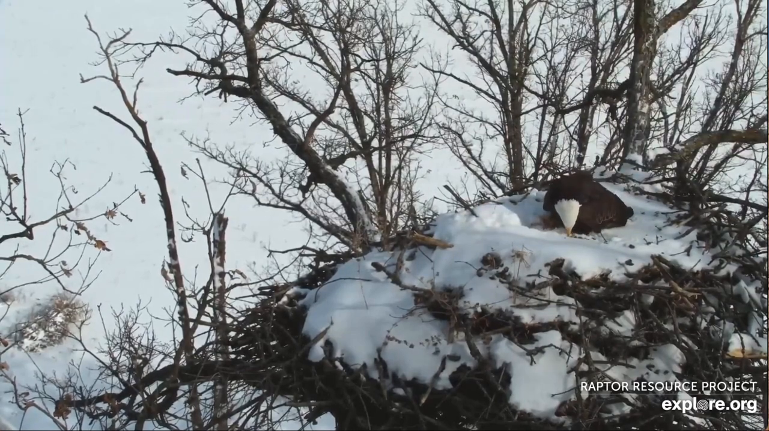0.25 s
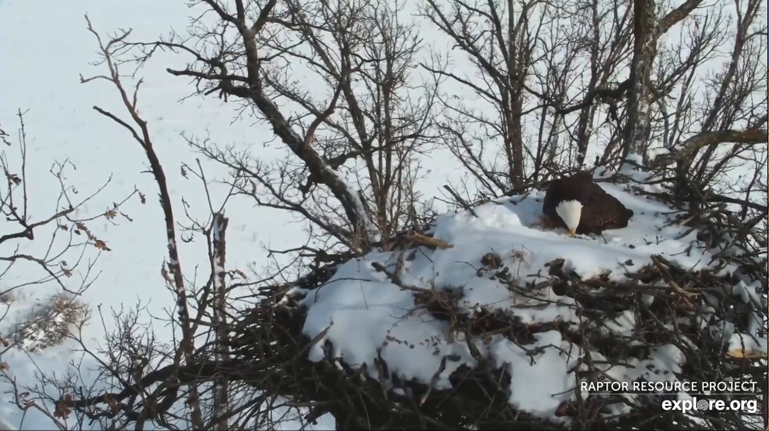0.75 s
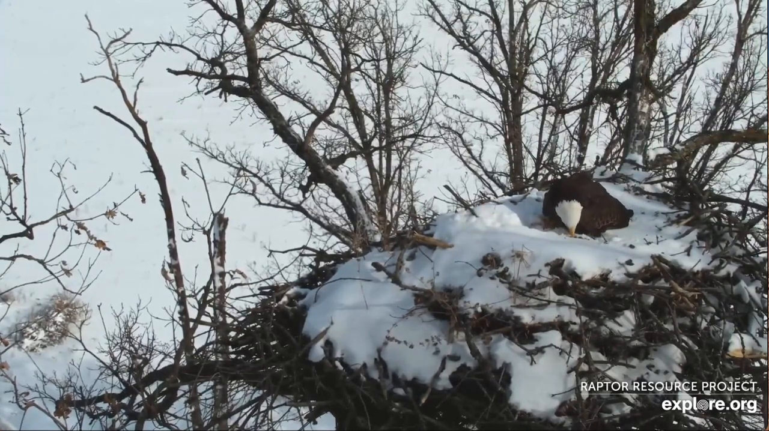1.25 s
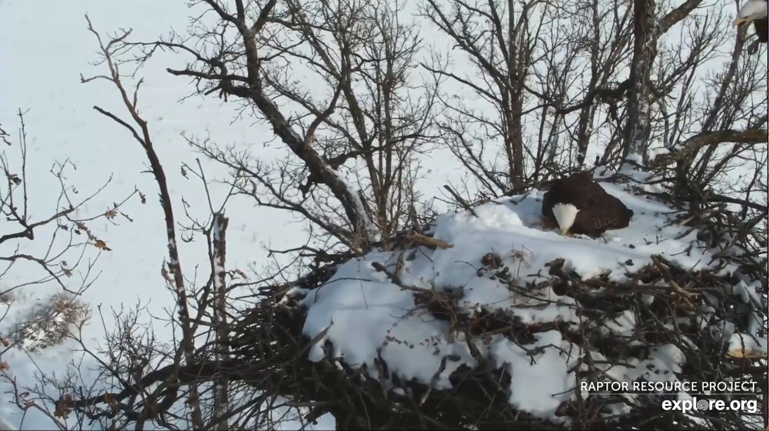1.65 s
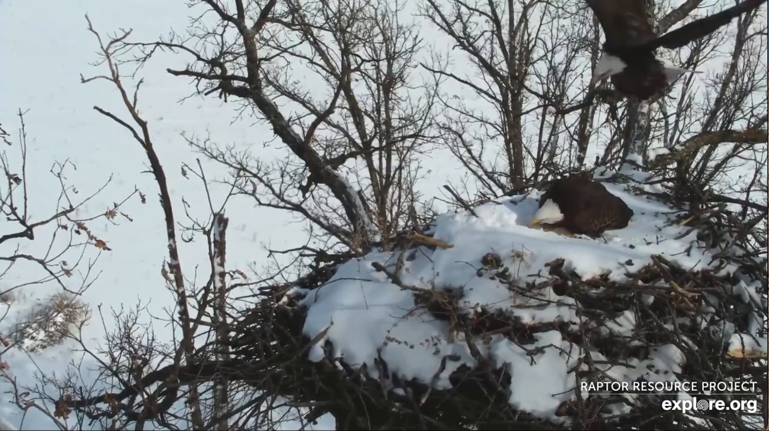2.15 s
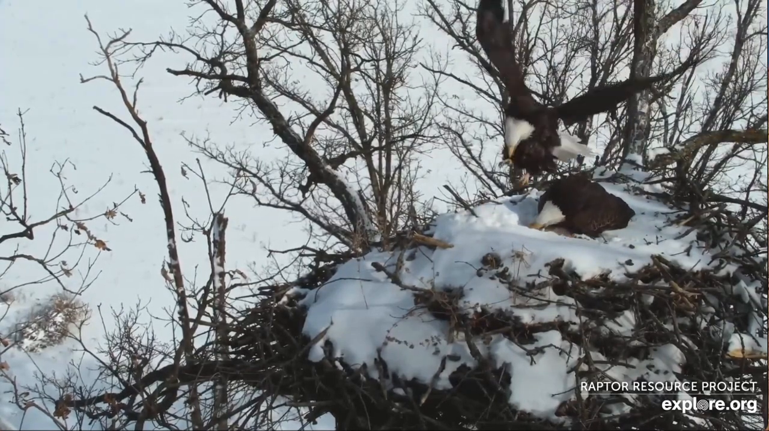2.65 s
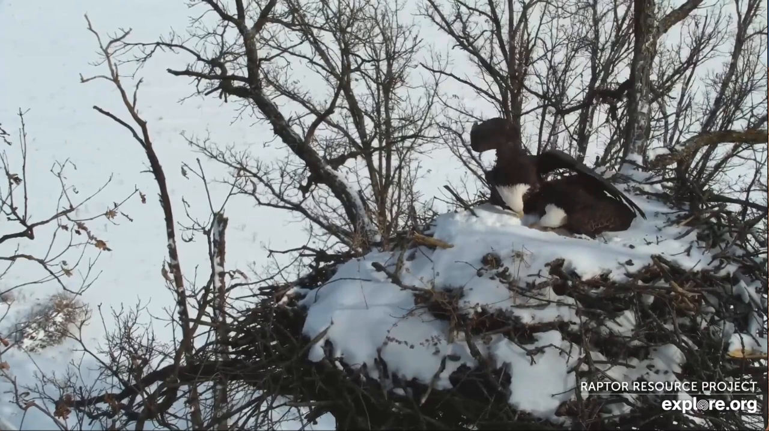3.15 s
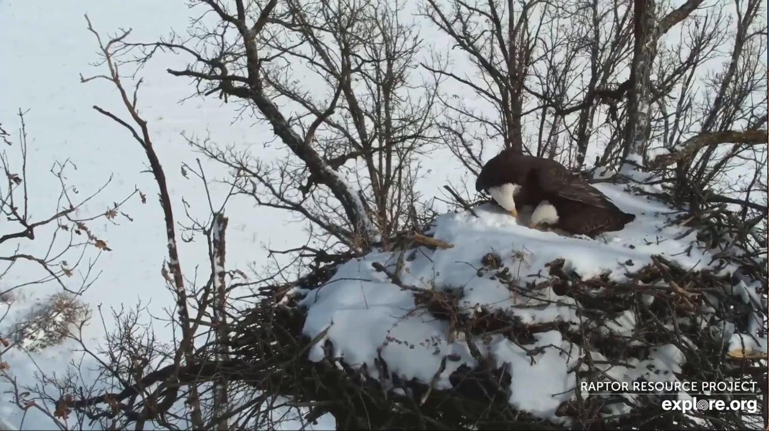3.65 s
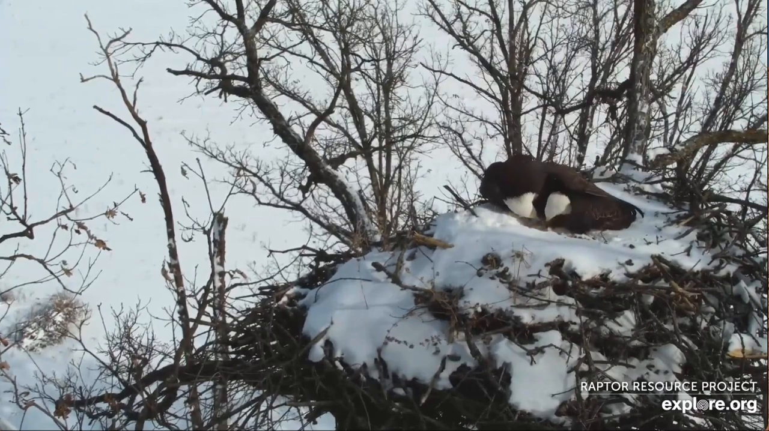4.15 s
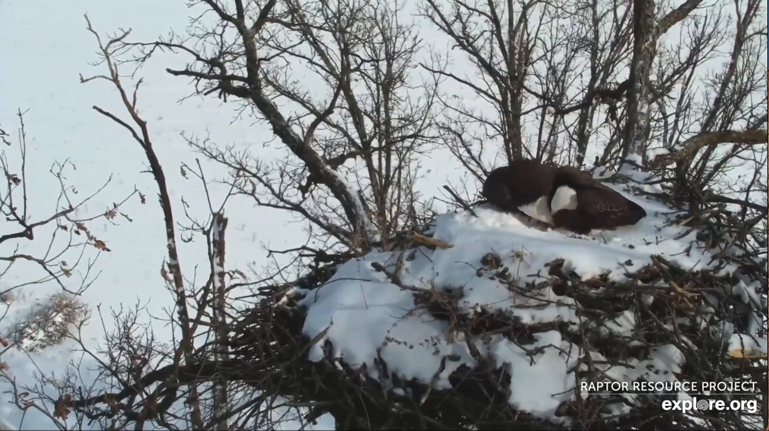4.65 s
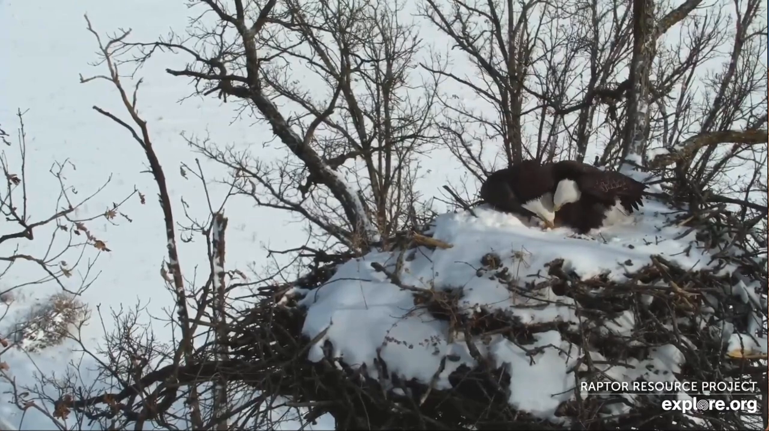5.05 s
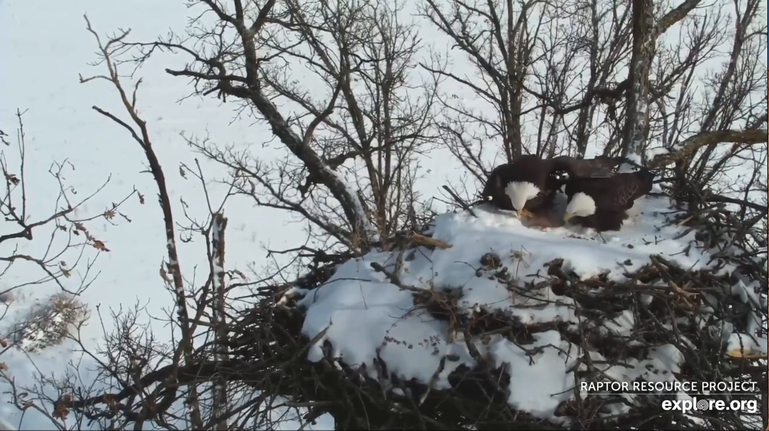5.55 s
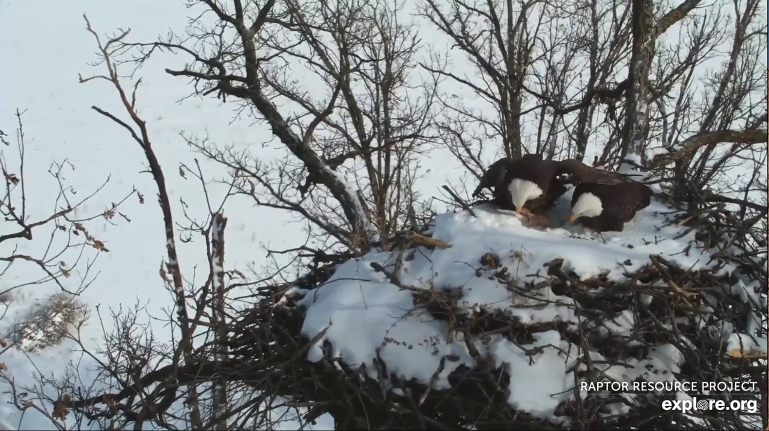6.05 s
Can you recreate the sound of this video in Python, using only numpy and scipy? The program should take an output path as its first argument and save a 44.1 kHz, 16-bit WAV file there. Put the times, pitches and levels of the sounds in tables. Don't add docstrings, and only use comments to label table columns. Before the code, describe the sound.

Outdoors at a treetop nest, wind makes a low, uneven boom on the microphone throughout. From 0 s a near eagle gives a loud, piercing, whistle-like scream while a second, farther bird sounds a fainter, lower rising note. More near screams come at about 0.6-1.1 s and 1.4-1.95 s, stepping abruptly in pitch and ending in hoarse breaks with little air thumps. Soft feather brushes pass near 2.05 s. A very loud yelp at 2.17 s is cut by a tiny dropout; at 2.24 s a rough, wavering scream returns, leaps to a shrill peak around 2.55 s and breaks at 2.75 s. A softer wail, 3.0-4.3 s, jumps to a thin high note; another rises from 4.6 to 5.5 s, with the far bird joining. A low held cry starts at 5.9 s and continues to the end. Sparse twig ticks and short woodland echoes surround the calls.

```python
import sys
import numpy as np
from scipy import signal
from scipy.io import wavfile
from scipy.ndimage import uniform_filter1d, minimum_filter1d

SR = 44100
rng = np.random.default_rng(int(sys.argv[2]) if len(sys.argv) > 2 else 0)


def amplitude_ratio(level_db):
    exponent = np.asarray(level_db, float) / 20
    return 10 ** exponent


def bounce(signal):
    frames = np.transpose(np.atleast_2d(signal))
    limited = np.clip(frames, -1, 1)
    pcm = np.round(limited * 32767).astype(np.int16)
    wavfile.write(sys.argv[1], SR, pcm)


N = 277830


def evened(x):
    return x / np.sqrt(np.mean(x ** 2) + 1e-20)


def read(points, hz):
    f, value = np.transpose(points)
    return np.interp(np.log(hz + 1), np.log(f + 1), value)


def add(mix, s, sound):
    part = mix[round(s * SR):][:len(sound)]
    part += sound[:len(part)]


def spells(rows, gain):
    out = np.zeros(N)
    for start, end, value in rows:
        add(out, start, gain(value) * signal.windows.tukey(round((end - start) * SR), .5))
    return out


def wobble(size):
    return evened(uniform_filter1d(uniform_filter1d(rng.standard_normal(N), size), size))


def noise(points, patchy_db, size=1024, wide=8, long=5):
    frames, hz = 4 * N // size + 5, np.fft.rfftfreq(size, 1 / SR)
    a, b, patches = rng.standard_normal((frames, len(hz), 3)).T
    patches = uniform_filter1d(patches, int(wide), axis=0)
    patches = evened(uniform_filter1d(patches, int(long), axis=1))
    level_db = read(points, hz)[:, None] + patchy_db * np.minimum(patches, 1.4)
    z = (a + 1j * b) * amplitude_ratio(level_db)
    return evened(signal.istft(z, nperseg=size, noverlap=size - size // 4)[1][:N])


# time_s, gust_db
GUSTS = [(0.0, -22.5), (0.17, -30.5), (0.33, -25.5), (0.58, -26), (1.04, -17.5), (1.25, -34.5),
         (1.5, -16.5), (1.93, -21.5), (2.0, -26.5), (2.2, -22.5), (2.69, -20.5), (3.11, -34.5),
         (3.59, -20.5), (4.44, -35), (5.35, -20), (5.74, -30), (6.29, -16.5)]
# frequency_hz, density_db (per Hz)
ROAR_SPECTRUM = [(53, -78), (90, -36), (128, -0.5), (165, -8), (245, -6.5), (798, -26.5), (2300, -50),
                 (15700, -64)]


def wind(near):
    t = np.arange(N) / SR
    boom_db = np.interp(t, *np.transpose(GUSTS))
    roar_db = -21 + 0.11 * (boom_db + 26.5) - 0.56 * t
    near_db = 10 * np.log10(abs(uniform_filter1d(near ** 2, size=3000)) + 1e-9)
    hum_from_s, hum_settles_s = 4.2, .9
    rest_db = -53 - 5.0 * np.clip(t - hum_from_s, 0, 1)
    push_db = np.maximum(-15.5 + 5 * np.minimum(near_db + 9, 0), rest_db)
    push = noise([(1, -22.0), (8, -35), (35, -36.5), (60, -45.5), (200, -104.5)], 2.7, size=8192)
    boom = noise([(38, -72.0), (52, -20.5), (66, -28.5), (73, -18), (80, -27.5), (95, -21.5),
                  (140, -47.5), (400, -114.5)], 3.4, size=8192)
    roar = noise(ROAR_SPECTRUM, 2.2) * amplitude_ratio(1.1 * wobble(size=500))
    settled = np.clip((t - hum_from_s) / hum_settles_s, 0, 1)
    hum_hz = 73 + (2.5 - 1.2 * settled) * wobble(size=6000)
    hum = np.sin(2 * np.pi * np.cumsum(hum_hz) / SR)
    boom = (1 - 0.48 * settled) * boom + (0.51 + .9 * settled) * hum
    hiss = noise([(6000, -48.0), (10000, -8.5), (13500, 0.0), (16000, -4.0)], 2.0)
    limited_push = 0.34 * np.tanh(amplitude_ratio(push_db) * push / 0.34)
    return limited_push + amplitude_ratio(boom_db) * boom + amplitude_ratio(roar_db) * evened(roar) + amplitude_ratio(-58.5) * hiss


# frequency_hz, t60_s
WOODS_DECAY = [(500, 1), (2100, 0.26), (2900, 0.86), (3500, 0.15), (6000, 1), (7500, 0.24), (9000, .6),
               (14000, 0.043)]
# time_s, echo_db
FACING = [
    (0, 1),
    (3, -3),
    (3.9, 1.5),
    (4.5, -11),
    (5.4, 1),
]


def woods(near, far):
    facing_db = np.interp(np.arange(N) / SR, *np.transpose(FACING))
    source = amplitude_ratio(-24.0 + facing_db) * near + amplitude_ratio(-31.5) * far
    taps = np.zeros(SR)
    at = np.arange(900, SR - 20, 20) + rng.integers(0, 20, (SR - 901) // 20)
    taps[at] = rng.choice([-1., 1.], len(at))
    hz, t, z = signal.stft(taps, SR, nperseg=256)
    decay = amplitude_ratio(-60 * t / read(WOODS_DECAY, hz)[:, None])
    tail = signal.istft(z * decay, SR, nperseg=256)[1]
    echo = signal.fftconvolve(source, tail / np.linalg.norm(tail))[:N]
    slap_s, slap_db = 0.016, -18.5
    add(echo, slap_s, amplitude_ratio(slap_db) * near[:N - round(slap_s * SR)])
    return echo


# start_s, peak_db
TWIG_TICKS = [(0.158, -38.5), (0.178, -43.5), (0.194, -39.5), (0.66, -41.5), (0.675, -38), (2.064, -42),
              (2.1651, -27), (2.845, -42), (2.858, -39.5), (5.747, -51), (5.888, -49)]


def ticks():
    out, t = np.zeros(N), np.arange(600) / SR
    for (s, db), grain in zip(TWIG_TICKS, rng.standard_normal((len(TWIG_TICKS), 600))):
        bright = np.diff(grain, n=3, prepend=[0, 0, 0])
        add(out, s, amplitude_ratio(db - 7.5 - 60 * t / 0.016) * bright)
    return out


# start_s, end_s, level_db
WING_BEATS = [
    (2.03, 2.1, -38.5),
    (2.09, 2.17, -44),
    (2.82, 2.89, -48.5),
]


def wings():
    rustle = signal.lfilter([1, -1], [1, -1.7, .72], rng.standard_normal(N))
    return spells(WING_BEATS, amplitude_ratio) * evened(rustle)


# start_s, end_s, start_hz, end_hz, level_db
THIN_TONES = [
    (3.7, 4.27, 2132, 2100, -42),
    (4.23, 4.37, 4200, 4200, -52.5),
    (4.4, 4.338, 1420, 1190, -43.5),
    (5.53, 5.75, 2200, 2200, -54),
    (6.03, 6.299, 870, 900, -36),
    (5.94, 6.04, 1100, 870, -40),
    (5.1, 5.45, 900, 840, -40),
    (2.5, 2.625, 1900, 2010, -27),
    (2.69, 2.79, 2080, 2010, -32),
]


def thin_tones():
    out, waver, swell = np.zeros(N), wobble(size=600), wobble(size=400)
    for start, end, hz0, hz1, db in THIN_TONES:
        at = np.arange(round(start * SR), round(end * SR))
        hz = np.linspace(hz0, hz1, len(at)) * (1 + 0.008 * waver[at])
        tone = np.sin(2 * np.pi * np.cumsum(hz) / SR)
        add(out, start, amplitude_ratio(db + 2.3 * swell[at]) * tone * signal.windows.tukey(len(at), .3))
    return out


# start_s, peak_db, pitch_hz
AIR_PUFFS = [
    (0.422, -33, 246),
    (1.102, -9, 291),
    (1.945, -7.5, 217.2),
    (2.269, -2.5, 395),
    (2.458, -4, 193),
    (2.507, -9.5, 205),
    (2.749, -11.5, 302),
]


def puffs():
    out, t = np.zeros(N), np.arange(900) / SR
    for (s, db, hz), grain in zip(AIR_PUFFS, rng.standard_normal((len(AIR_PUFFS), 900))):
        burst = np.sin(2 * np.pi * hz * t) + 0.47 * evened(uniform_filter1d(grain, size=16))
        add(out, s - .003, amplitude_ratio(db - 3.0) * burst * np.hanning(900))
    return out


def phrase(notes, follows):
    rows = []
    for second_db, upper_db, points in notes:
        s, hz, db = np.transpose(points)
        slack = db - db.max()
        rows += list(np.transpose([s, hz, db, second_db + slack, upper_db + follows * slack]))
    return sorted(rows, key=lambda row: row[0])


# start_s, end_s, shake_db
HOARSE_SPELLS = [(.402, .43, -15), (.85, .892, -24), (1.093, 1.13, -14), (1.362, 1.406, -14),
                 (1.47, 1.5, -18), (1.77, 1.89, -23), (1.938, 1.962, -14), (2.255, 2.29, -13),
                 (2.458, 2.472, -13), (2.5, 2.58, -22), (2.612, 2.637, -15), (2.674, 2.692, -14),
                 (2.74, 2.775, -16), (3.675, 3.70, -16), (3.795, 3.88, -21), (4.2, 4.3, -20),
                 (4.87, 5.06, -19), (5.1, 5.45, -28), (6.06, 6.299, -27), (1.64, 1.78, -22),
                 (1.5, 1.64, -24), (.78, 1.09, -27), (.1, .4, -27), (2.29, 2.45, -25), (1.89, 1.94, -23),
                 (5.49, 5.53, -18)]
# frequency_hz, density_db (per Hz)
BREATH_SPECTRUM = [(300, -6.5), (1500, 3.5), (3000, 1), (4500, -38), (9000, -2.5), (16000, -29.5)]


def voice(calls, order, factor, flat_db, steep, jitter, shimmer_db, breath_db, fuzz_db,
          strain_db, sag_db, gape_db, hollow_db):
    tone, air, huff = np.zeros((3, N))
    pitch = [row[:2] for rows in calls for row in rows]
    hz = np.interp(np.arange(N) / SR, *np.transpose(pitch))
    steady = 1. * (abs(np.gradient(hz)) < 6)
    steady = uniform_filter1d(minimum_filter1d(steady, size=60), size=90)
    hz = hz * (1 + jitter * wobble(size=150))
    churn = wobble(size=12) + 1j * wobble(size=12)
    hoarse = 1 + spells(HOARSE_SPELLS, amplitude_ratio) * (wobble(size=70) * .5 + 1j * wobble(size=70))
    turns, level_drift = np.exp(2j * np.pi * np.cumsum(hz) / SR), wobble(size=300)
    for rows in calls:
        s, *columns = np.transpose(rows)
        at = np.arange(round(s[0] * SR), min(round(s[-1] * SR) + 60, N))
        first_db, second_db, upper_db = (np.interp(at / SR, s, c) for c in columns[-3:])
        upper_db = upper_db + strain_db[at]
        second_db = second_db + sag_db[at] + 2.3 * np.minimum(level_drift[at - 7000], .8)
        turn, beat = turns[at], factor[at]
        shake = beat * (hoarse[at] + amplitude_ratio(fuzz_db) * churn[at])
        fuzz = hoarse[at] + amplitude_ratio(fuzz_db + 0.7 * (first_db + 7.5)) * churn[at]
        slope_db = np.minimum(steep * (upper_db - first_db - flat_db), 0)
        second_churn = 1 + amplitude_ratio(first_db - 26.5) * churn[at - 5000]
        sound = amplitude_ratio(first_db) * turn * shake
        sound = sound + amplitude_ratio(second_db) * (turn * beat * fuzz) ** 2 * second_churn
        for k in range(3, 10):
            octaves = np.log2(k / order) + 6 * np.log2(max(k / 7.5, 1))
            octaves = octaves + 5.5 * np.log2(np.maximum(k * hz[at] / 9800, 1))
            flicker_db = 1.8 * np.log2(k) * np.minimum(level_drift[at - 3000 * k], .6)
            beak_db = (k > order) * gape_db[at] + (k < order) * hollow_db[at]
            partial_db = upper_db + slope_db * octaves + flicker_db + beak_db
            sound += amplitude_ratio(partial_db) * (turn * fuzz) ** k * beat * (k * hz[at] < 16500)
        window = signal.windows.tukey(len(at), min(1, 440 / len(at)))
        edge = amplitude_ratio(shimmer_db * level_drift[at]) * window * (0.23 + .75 * steady[at])
        tone[at] += np.sqrt(2) * sound.imag * edge
        air[at] += amplitude_ratio(upper_db - 6.0 + 0.31 * (first_db + 1)) * edge
        huff[at] += amplitude_ratio(first_db - 20.0) * edge
    hiss = noise(BREATH_SPECTRUM, 6, size=512, wide=4, long=16)
    dull = signal.sosfilt(signal.butter(4, 3800, fs=SR, output="sos"), hiss)
    return tone + amplitude_ratio(breath_db) * (air * hiss + huff * dull)


# [time_s, pitch_hz, effort_db]
FAR_CALLS = [
    (-31.5, -34.5, [(0, 1200, -28.5), (0.15, 1156, -27.5), (0.33, 1183, -32.5), (0.38, 1165, -42.5), (0.42, 1160, -24), (0.5, 1189, -23), (0.72, 1235, -20.5), (0.94, 1278, -25), (0.96, 1326, -67)]),
    (-27, -42.5, [(1.236, 1210, -47), (1.254, 1257, -30.5), (1.256, 1866, -24), (1.31, 1806, -23.5), (1.38, 1859, -26.5), (1.5, 1888, -34), (1.8, 2004, -39.5), (1.93, 1957, -44)]),
    (-27.5, -41, [(1.945, 1920, -31), (1.975, 1924, -19), (2.015, 1796, -34)]),
    (-37.5, -82, [(2.78, 2004, -26), (3.0, 2043, -23.5), (3.07, 2173, -27.5), (3.115, 2164, -25), (3.135, 2147, -48)]),
    (-26, -52.5, [(3.348, 1927, -21), (3.358, 1880, -24), (3.372, 1565, -26)]),
    (-36, -46, [(3.64, 1305, -35.5), (3.72, 1417, -30), (3.8, 1442, -31.5), (4.11, 1554, -24.5), (4.14, 1570, -49)]),
    (-28, -33.5, [(4.78, 1254, -28.5), (4.83, 1275, -26), (4.95, 1313, -27.5), (5.05, 1321, -22), (5.2, 1370, -20), (5.43, 1420, -21), (5.448, 1358, -22.5), (5.462, 1163, -26)]),
]
# start_s, end_s, overtones_db
FAR_SLACK_SPELLS = [
    (4.77, 5.0, -9.5),
]
# start_s, end_s, level_db
FAR_SECOND_SAGS = [
    (2.97, 3.15, -15),
]


def far_bird():
    calls = [phrase([call], follows=1) for call in FAR_CALLS]
    return voice(calls, order=3, factor=np.ones(N), flat_db=17.0, steep=0.94, jitter=0.00354,
                 shimmer_db=1.5, breath_db=0.0, fuzz_db=-28.5,
                 strain_db=spells(FAR_SLACK_SPELLS, float), sag_db=spells(FAR_SECOND_SAGS, float),
                 gape_db=np.zeros(N), hollow_db=np.zeros(N))


# start_s, end_s,
# start_beat_hz, end_beat_hz, lower_sideband_db
SIDEBAND_BEATS = [(0.656, 0.708, 847, 729.5, -14.5), (1.362, 1.417, 1883, 1955, -4),
                  (1.466, 1.494, 2098, 1985.5, -5.5), (1.497, 1.57, 1879, 1761, -20.5),
                  (2.254, 2.271, 1012, 1106, -5.5), (3.009, 3.027, 673, 735.5, -10.5),
                  (2.504, 2.554, 2717.5, 2303, -21.5), (2.606, 2.651, 2050.5, 1963.5, -13),
                  (2.555, 2.59, 2090.5, 2079.5, -22), (1.545, 1.64, 1521, 1258, -28),
                  (1.79, 1.925, 1428.5, 1058, -33), (1.366, 1.404, 470.5, 482.5, -11),
                  (2.256, 2.276, -960, -820, -7), (2.268, 2.286, -420, -350, -14),
                  (2.762, 2.778, 598, 563, -8), (5.46, 5.505, -1060, -1000, -26),
                  (5.245, 5.275, -1380, -1380, -24), (2.272, 2.286, 399.5, 429.5, -15),
                  (2.16, 2.176, 600.5, 602.5, -16.5), (2.626, 2.642, -480, -380, -10),
                  (2.3, 2.36, 330, 300, -26.5), (2.612, 2.632, -620, -420, -20),
                  (4.275, 4.29, -850, -950, -17), (2.29, 2.32, 957.5, 938.5, -29),
                  (5.935, 5.99, -700, -690, -38), (2.622, 2.635, 1545, 1569, 0),
                  (2.623, 2.634, -530, -480, -8.5), (2.602, 2.624, 559.5, 539.5, -11.5),
                  (2.678, 2.69, 2133.5, 2202, 0), (3.325, 3.701, 1018, 1101.5, -32.5),
                  (5.912, 5.929, 670, 744.5, -17.5), (4.605, 4.632, 586, 769, -15),
                  (4.939, 4.987, 620.5, 638.5, -8.5), (4.992, 5.05, 639.5, 646, -4.5),
                  (5.05, 5.074, 621, 620, -9.5)]
# start_s, end_s, start_beat_hz, end_beat_hz, level_db
MEMBRANE_DUETS = [
    (3.796, 3.872, 560, 480, -13.5),
    (3.885, 4.001, 540, 430, -7),
    (4.107, 4.255, 505, 420, -5),
    (5.94, 5.99, 720, 700, -30),
]


def beating():
    out, rasp = np.ones(N, complex), wobble(size=40)
    flutter = amplitude_ratio(3.8 * wobble(size=120))
    for table, upper_db in [(SIDEBAND_BEATS, -10.5), (MEMBRANE_DUETS, -24)]:
        for start, end, hz0, hz1, low_db in table:
            n = round((end - start) * SR)
            beat_hz = np.linspace(hz0, hz1, n) + 28 * rasp[:n]
            turn = np.exp(2j * np.pi * np.cumsum(beat_hz) / SR)
            sidebands = amplitude_ratio(low_db) / turn + amplitude_ratio(low_db + upper_db) * turn
            window = signal.windows.tukey(n, min(1, 260 / n))
            add(out, start, sidebands * flutter[round(start * SR):][:n] * window)
    return out


# [time_after_break_s, pitch_hz, effort_db]
CLOSING_STEPS = [
    (-21, -28.5, [(-.013, 2360, -7.5), (0.0, 2230, -14.5)]),
    (-31.5, -64.5, [(.002, 1750, -25), (.015, 1587, -25)]),
]


def closing(s, last_db):
    return [(second_db + db, fourth_db + db, np.array(points) + [s, 0, db])
            for (second_db, fourth_db, points), db in zip(CLOSING_STEPS, [0, last_db])]


# [time_s, pitch_hz, effort_db]
SCREAM_1 = [
    (-23.5, -42, [(0.0, 2740, -9.5), (0.03, 2570, -27)]),
    (-22, -38.5, [(0.039, 2324, -13.5), (0.081, 2430, -8), (0.092, 2457, -14.5)]),
    (-21.5, -35.5, [(0.096, 2738, -14), (0.192, 2815, -10), (0.215, 2830, -15), (0.224, 2764, -18.5)]),
    (-21, -22, [(0.236, 2755, -8), (0.264, 2736, -10), (0.382, 2979, -6.5), (0.405, 2854, -9), (0.411, 2709, -9.5)]),
]
SCREAM_2 = [
    (-20.5, -41.5, [(0.637, 1300, -12.5), (0.652, 1246, -12)]),
    (-19, -65.5, [(0.653, 1880, -15), (0.668, 1935, -10)]),
    (-24, -55, [(0.669, 2820, -10), (0.681, 2636, -12.5), (0.703, 2635, -19)]),
    (-18, -26, [(0.709, 2330, -12.5), (0.722, 2350, -12), (0.755, 2402, -6.5), (0.776, 2560, -9.5)]),
    (-24.5, -20, [(0.782, 2760, -11), (0.808, 2834, -5.5), (0.878, 2860, -9), (0.897, 2730, -5.5), (0.954, 2745, -9), (0.964, 2823, -6.5), (1.027, 2946, -7.5), (1.088, 2987, -7), (1.1, 2850, -8)]),
]
SCREAM_3 = [
    (-18.5, -24, [(1.365, 2326, -26), (1.374, 2335, -14.5), (1.402, 2402, -5.5)]),
    (-11.5, -30.5, [(1.403, 1933, -11), (1.44, 1960, -13), (1.472, 2035, -11.5)]),
    (-21.5, -19, [(1.473, 2730, -7.5), (1.53, 2808, -8.5), (1.546, 2770, -6), (1.56, 2580, -7.5), (1.615, 2695, -7.5), (1.636, 2668, -7.5)]),
    (-20, -10, [(1.69, 2939, -7), (1.769, 2880, -6.5), (1.795, 2646, -8), (1.816, 2738, -7.5), (1.859, 2696, -6), (1.925, 2820, -8), (1.941, 2767, -2)]),
]
YELP_4 = [
    (-1.5, -38.5, [(2.166, 1675, -28), (2.176, 1770, 3.5)]),
]
SCREAM_5 = [
    (-5.5, -17, [(2.238, 1835, -1.5), (2.251, 1950, -10), (2.265, 1928, -11.5), (2.288, 1890, -6), (2.331, 1830, -10), (2.392, 1880, -7), (2.428, 1975, -8.5), (2.463, 2061, -2)]),
    (-24.5, -19.5, [(2.464, 2578, -7), (2.505, 2646, -6.5), (2.514, 3034, -11), (2.526, 3160, -6.5), (2.538, 3483, -14.5)]),
    (-28.5, -18, [(2.54, 4010, -18), (2.548, 3770, -13), (2.553, 3210, -7.5), (2.569, 2962, -7.5), (2.579, 2643, -8), (2.623, 2597, -6)]),
    (-30, -22, [(2.625, 2056, -6.5), (2.68, 2136, -4.5)]),
    (-23, -16.5, [(2.682, 2743, -8), (2.725, 2718, -6.5), (2.74, 2433, -7.5)]),
]
WAIL_6 = [
    (-21, -52.5, [(2.99, 1146, -22.5), (3.0, 1255, -19.5), (3.021, 1317, -17.5)]),
    (-19, -43.5, [(3.022, 1926, -13), (3.091, 1889, -15), (3.295, 1942, -14)]),
    (-17, -33.5, [(3.326, 1988, -14.5), (3.337, 2008, -7), (3.344, 2034, -17.5), (3.349, 2010, -9.5), (3.356, 2034, -12), (3.492, 2058, -13.5), (3.559, 2144, -14.5), (3.666, 2119, -11.5), (3.69, 2190, -15.5)]),
    (-37, -92, [(3.691, 3607, -18.5), (3.758, 3670, -16.5), (3.858, 3503, -15), (3.915, 3560, -22), (3.994, 3500, -21.5)]),
    (-33, -48, [(4.0, 2900, -17), (4.03, 2863, -17.5), (4.1, 2892, -21), (4.109, 3040, -24)]),
    (-47, -76, [(4.113, 3500, -21), (4.157, 3530, -21.5), (4.204, 3380, -23.5), (4.253, 3450, -23), (4.257, 2780, -19.5), (4.27, 2610, -22)]),
    (-27, -52, [(4.273, 1910, -25), (4.292, 1514, -31.5)]),
]
WAIL_7 = [
    (-36, -56, [(4.578, 1097, -40), (4.59, 1143, -25.5), (4.615, 1220, -26)]),
    (-28, -52, [(4.616, 1802, -26.5), (4.666, 1751, -24.5), (4.739, 1843, -25.5), (4.81, 1837, -25)]),
    (-34, -50.5, [(4.848, 1848, -20.5), (4.88, 1806, -26.5), (4.94, 1885, -23.5), (4.976, 1896, -22), (4.988, 1937, -29), (5.04, 1937, -28.5)]),
    (-27.5, -47, [(5.053, 1899, -19), (5.125, 1935, -14.5), (5.422, 2240, -13), (5.488, 2157, -10.5), (5.515, 1794, -23)]),
    (-24, -87, [(5.517, 1254, -19), (5.523, 1060, -30.5), (5.53, 1027, -56)]),
]
CRY_8 = [
    (-18, -39, [(5.908, 1290, -44), (5.918, 1305, -20), (5.948, 1397, -16), (6.036, 1309, -19.5), (6.147, 1350, -16.5), (6.298, 1363, -13.5)]),
]
# time_s, last_step_db
VOICE_BREAKS = [
    (.425, -2.5),
    (1.124, -4.5),
    (1.958, -4.5),
    (2.759, 12),
]
# start_s, end_s, overtones_db
THROAT_STRAIN = [(0, .036, -8), (.076, .095, 12), (.408, .445, -16), (.705, .748, -6), (1.105, 1.145, -7.5),
                 (1.364, 1.405, -0.5), (1.4, 1.465, 4), (3.329, 3.345, 3.5), (3.02, 3.12, -2.5),
                 (5.91, 5.93, -8), (5.39, 5.49, -6.5), (1.95, 1.975, -5), (4.11, 4.25, 8)]
# start_s, end_s, level_db
SECOND_SAGS = [(2.252, 2.285, -5.5), (2.43, 2.467, -8.5), (2.62, 2.685, 1), (3.315, 3.328, -6),
               (4.82, 4.87, -9), (4.92, 5.045, -9.5), (2.26, 2.274, -9), (1.65, 1.79, -3.5),
               (0.085, .22, -0.5), (.9, 1.0, 1.5), (2.69, 2.76, -2), (2.465, 2.62, -3), (1.5, 1.65, -2),
               (1.79, 1.94, -2)]
# start_s, end_s, level_db
BEAK_GAPE = [(1.4, 1.475, 7), (1.36, 1.405, 1), (.03, .1, 2.5), (2.29, 2.46, 6.5), (5.93, 6.299, 1.5),
             (3.69, 4.0, -3), (5.04, 5.4, 6), (4.6, 4.7, -6.5)]
# start_s, end_s, level_db
THIRD_HOLLOW = [(2.24, 2.4, -8.5), (1.47, 1.6, -4.5), (4.26, 4.3, -7), (3.02, 3.3, -1.5), (5.05, 5.3, 3),
                (5.92, 6.299, 1), (3.69, 3.95, -10), (2.47, 2.68, -2)]


def near_bird():
    full = [SCREAM_1, SCREAM_2, SCREAM_3, SCREAM_5]
    closed = [call + closing(*row) for call, row in zip(full, VOICE_BREAKS)]
    ordered = closed[:3] + [YELP_4] + closed[3:] + [WAIL_6, WAIL_7, CRY_8]
    calls = [phrase(call, follows=1.76) for call in ordered]
    return voice(calls, order=4, factor=beating(), flat_db=-21.0, steep=1.0, jitter=0.0031,
                 shimmer_db=0.38, breath_db=-9.5, fuzz_db=-35.0,
                 strain_db=spells(THROAT_STRAIN, float), sag_db=spells(SECOND_SAGS, float),
                 gape_db=spells(BEAK_GAPE, float), hollow_db=spells(THIRD_HOLLOW, float))


def scene():
    near, far = near_bird(), far_bird()
    mixing = amplitude_ratio(-31.5 + 4.0 * wobble(size=500)) * near * far
    mix = wind(near) + woods(near, far) + ticks() + wings() + thin_tones() + puffs() + mixing + far + near
    return np.array([mix, mix])


def thinned(x, under_db, hole_db):
    hz, t, z = signal.stft(x[0], SR, nperseg=1024, noverlap=768)
    power = uniform_filter1d(abs(z) ** 2, size=9, axis=1)
    band = np.arange(len(hz)) // 8
    band_power = abs(np.add.reduceat(power, np.arange(0, len(hz), 8))) / 8
    band_db = 10 * np.log10(band_power + 1e-18)[band]
    luck = uniform_filter1d(rng.standard_normal((len(t), 65)), size=12, axis=0)
    luck_db = 3.7 * evened(luck).T[band]
    peak_db = 10 * np.log10(power.max(axis=0) + 1e-18)
    threshold_db = peak_db - under_db - luck_db - 1.5 * (hz[:, None] - 5000) / 1000
    weak = (band_db < threshold_db) & (abs(hz - 8000) < 4500)[:, None]
    holes_db = hole_db * uniform_filter1d(weak * 1., size=3, axis=1)
    return signal.istft(z * amplitude_ratio(holes_db), SR, nperseg=1024, noverlap=768)[1][None, :N]


def roll_off(x):
    return signal.sosfilt(signal.butter(12, 15880, fs=SR, output="sos"), x)


# cut_s, return_s, fade_in_s
LINK_GAP = (2.1765, 2.2355, .017)
# start_s, end_s, level_db
TREBLE_SPLITS = [
    (.848, .888, -8),
    (1.768, 1.812, -12),
    (1.826, 1.876, -6),
    (2.293, 2.336, -13),
    (3.365, 3.41, -26),
]


def record(dry):
    bent = dry + .2 * dry ** 2
    clipped = bent / (1 + abs(bent / .98) ** 10) ** (1 / 10)
    cut, back, fade = LINK_GAP
    t = np.arange(N) / SR
    link = np.where(t < cut, 1, np.clip((t - back) / fade, .0002, 1))
    sent = link * thinned(clipped[:1], under_db=61, hole_db=-22)
    lowpass = signal.firwin(511, 15880, window=("kaiser", 9), fs=SR)
    limited = signal.oaconvolve(sent, lowpass[None], "same")
    treble = signal.sosfilt(signal.butter(6, 6800, "high", fs=SR, output="sos"), limited[0])
    side = spells(TREBLE_SPLITS, amplitude_ratio) * treble * wobble(size=60)
    mix = np.clip(limited + [[1], [-1]] * side, -1, 1)
    return roll_off(mix)


dry = scene()
out = record(dry)
bounce(out)
```